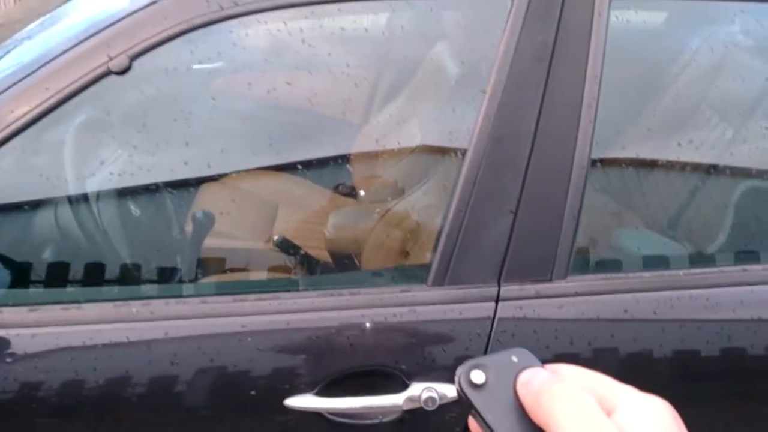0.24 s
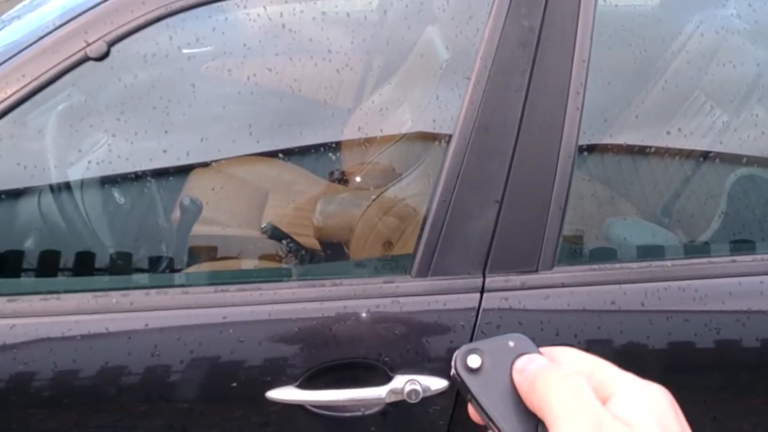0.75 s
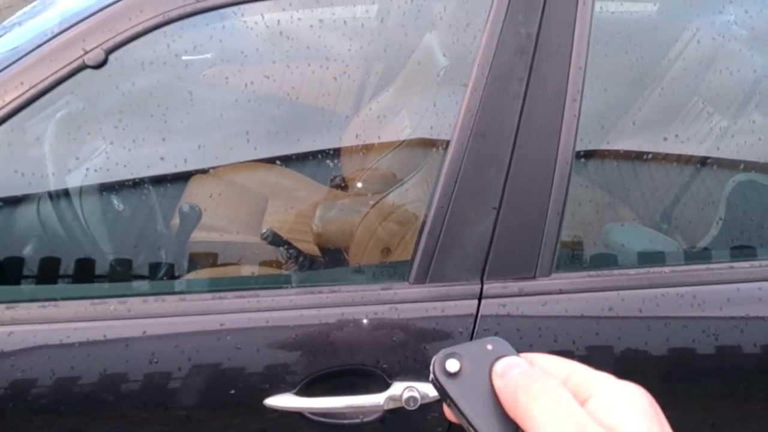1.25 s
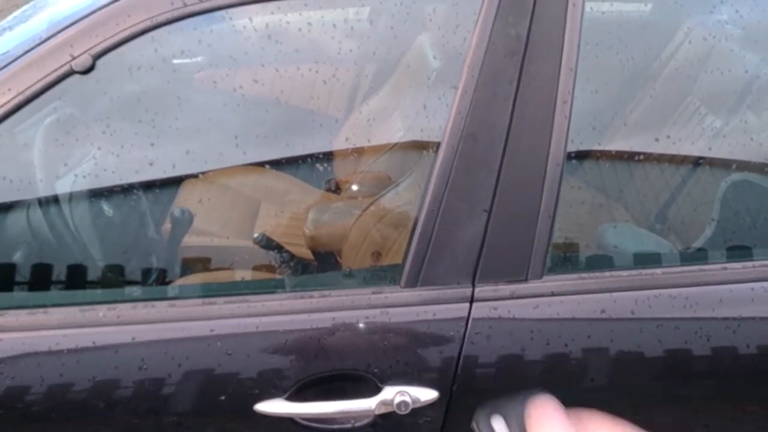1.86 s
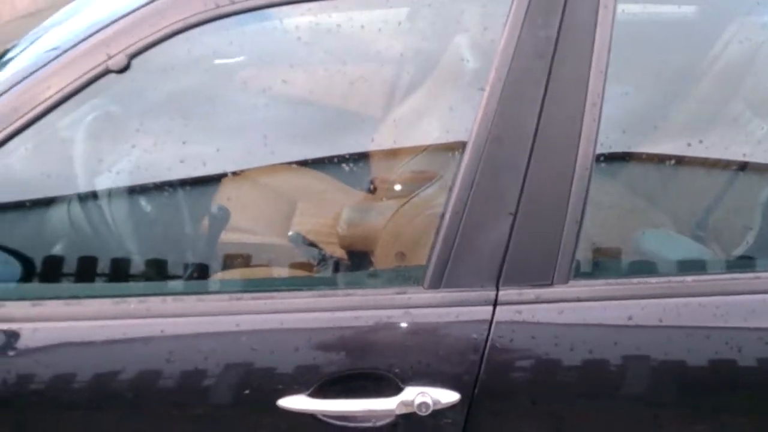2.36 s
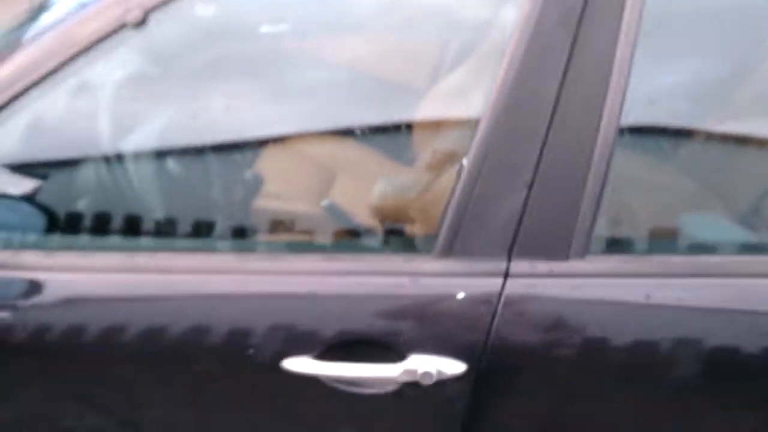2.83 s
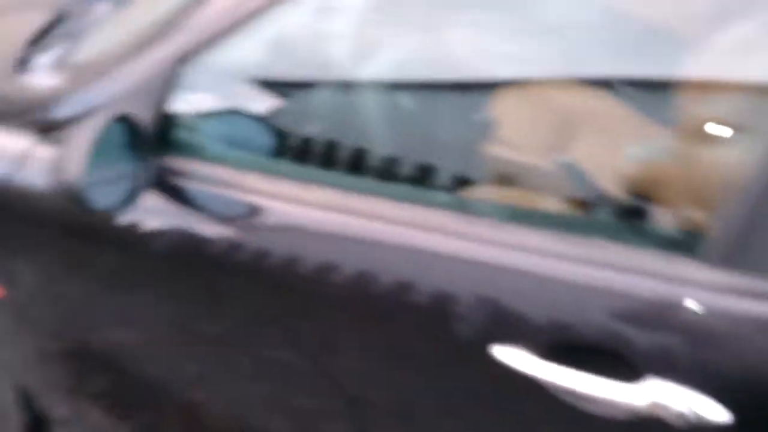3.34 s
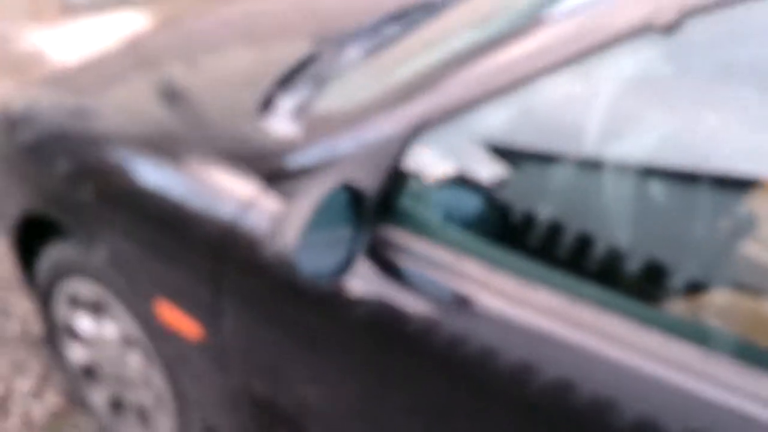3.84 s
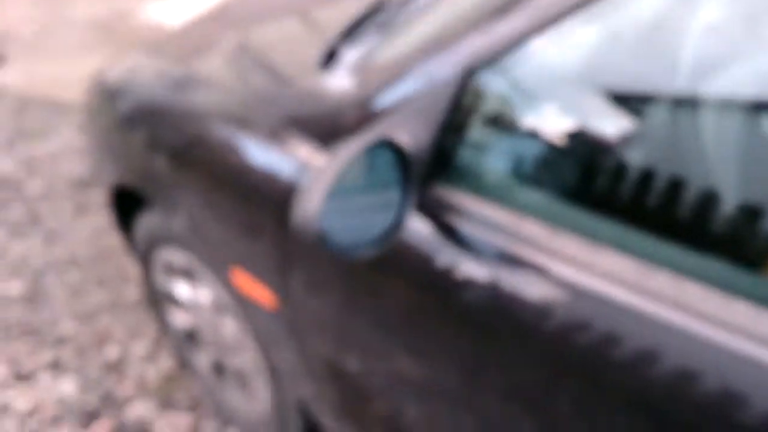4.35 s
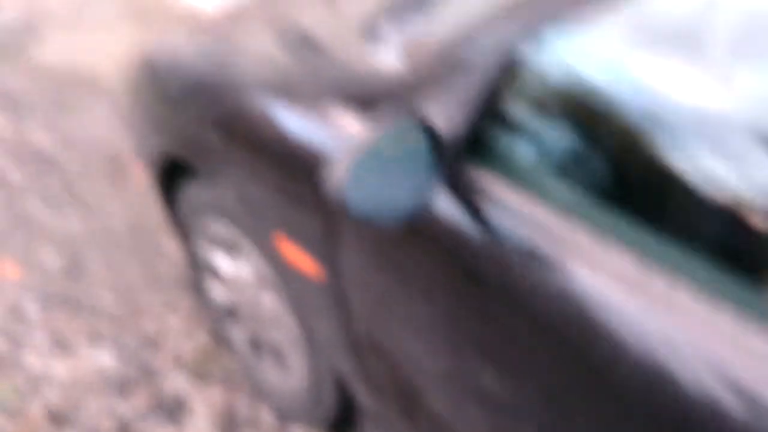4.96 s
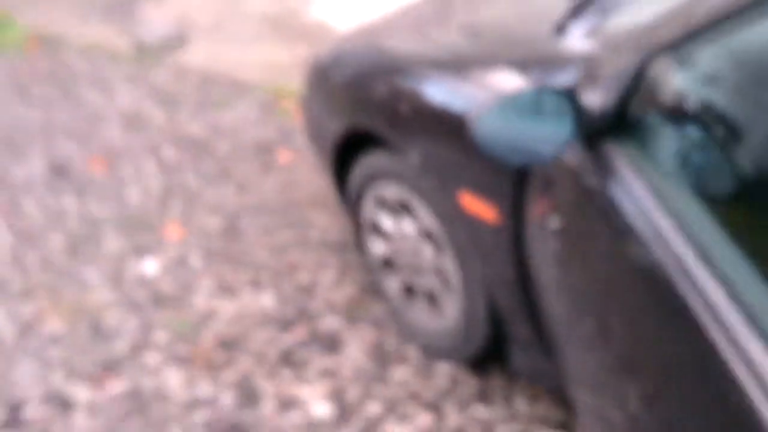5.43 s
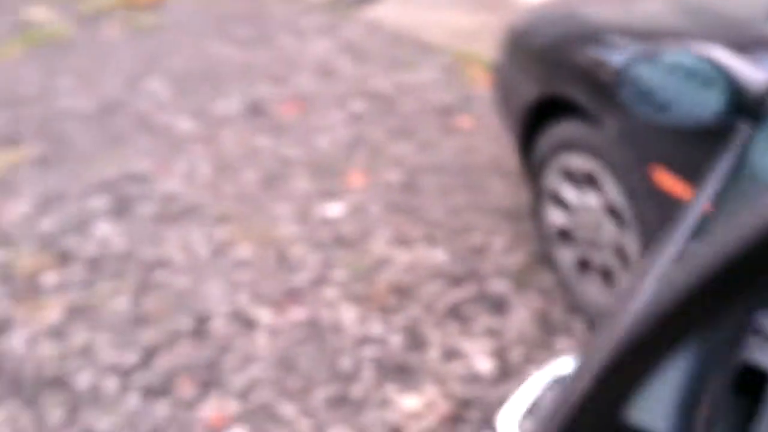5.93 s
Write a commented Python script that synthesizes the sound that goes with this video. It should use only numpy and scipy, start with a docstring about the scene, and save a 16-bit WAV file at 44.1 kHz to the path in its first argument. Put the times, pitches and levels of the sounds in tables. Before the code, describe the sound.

A handheld microphone near a parked car on gravel. Soft key contacts come before and after a brief lock motor buzz. Shoes shift on the stones, the bunch jangles densely, and its loud snap stands out. After a short lull the latch releases with a deep clunk, then the opening door knocks over its stay amid rustling sleeve and buffeting air.

```python
"""Outdoors by a parked car: a distant murmur and buffeting air, both shaped noise, lie under everything.
Keys touch, scraping noise with ringing blade modes; the lock motor whirrs briefly, noise with a boom.
The keys then jangle in the hand, shoes shift on gravel, cloth swishes in noise swells, and the key snaps.
At last the handle is pulled, the latch lets go and the door swings over the notches of its stay:
each blow excites modes of skin and latch case, clattering noise and, now and then, a low push of air."""
import sys
import numpy as np
from scipy import signal
from scipy.fft import rfft, irfft, next_fast_len
from scipy.io import wavfile
from scipy.ndimage import uniform_filter1d, map_coordinates

SR = 44100
rng = np.random.default_rng(int(sys.argv[2]) if len(sys.argv) > 2 else 0)


def waveform_to_disk(signal):
    """Save audio, clipped to [-1, 1], as 16-bit WAV at the path in sys.argv[1]."""
    frames = np.transpose(np.atleast_2d(signal))
    scaled = np.clip(frames, -1, 1) * 32767
    samples = np.round(scaled).astype(np.int16)
    wavfile.write(sys.argv[1], SR, samples)


N = 272979  # length in samples

# Spectra are relative: noise() rescales them to rms 1. Positive left_right_db means louder on the left.
# Coherence of the two channels: frequency_hz, likeness (1 = identical)
COHERENCE = [(100, 0.46), (300, 0.95), (600, 0.52), (1500, 0.083), (4000, 0.065), (12000, 0.051)]
TOP_HZ = 15650  # upper band limit

# Outdoor murmur, level before MURMUR_DB is added: time_s, level_db
MURMUR_LEVEL = [
    [(0.0, -75.5), (0.65, -82), (1.13, -76), (1.42, -81.5), (2.11, -77), (2.9, -71)],
    [(3.8, -74.5), (4.64, -70.5), (4.82, -70.5), (5.85, -70.5), (6.02, -69.5), (6.19, -72.5)],
]
# Murmur spectrum: frequency_hz, level_db
MURMUR_SPECTRUM = [(59, -45), (100, -7), (407, -10), (880, -7.5), (1240, -10), (4000, -24), (5200, -28),
                   (8800, -120)]
# Microphone hiss spectrum: frequency_hz, level_db
HISS_SPECTRUM = [(1000, -7), (4000, 0), (10000, 0), (15500, -6)]
MURMUR_DB, HISS_DB = 6.5, -79  # offset of the murmur; level of the hiss
# Puffs of air on the microphone: peak_s, level_db, fall_s (e-fold)
AIR_PUFFS = [(.92, -51, 0.14), (1.55, -53.5, 0.13), (2.61, -46.5, 0.079), (2.82, -46.5, 0.15),
             (3.135, -38.5, 0.044), (4.42, -50, 0.088), (4.95, -47.5, 0.2), (5.47, -43, 0.11),
             (5.6, -32.5, 0.029), (5.86, -45, 0.12)]
# Buffeting spectrum: frequency_hz, level_db
BUFFET_SPECTRUM = [(7.1, -44), (12, 10.5), (22, 4.5), (41, -1), (65, -4.5), (92, -13), (128, -24),
                   (390, -35), (660, -120)]
PUFF_RISE, BREEZE_DB = 0.93, -58  # rise time over fall time; steady breeze between the puffs

# Decay of the yard's scattered answer: frequency_hz, t60_s
YARD_DECAY = [(150, 0.91), (450, 0.46), (1200, 0.3), (3000, 0.44), (10000, 0.24)]
KEYS_YARD_DB, CAR_YARD_DB = -18, -17.5  # send levels to the yard

# Shoes on gravel: start_s, grit_db, tread_db, tread_hz, decay_s (e-fold)
FOOTFALLS = [(2.603, -77, -39.5, 112, 0.016), (2.616, -48.5, -53.5, 218, 0.064),
             (2.798, -83, -53.5, 168, 0.017), (2.83, -70, -49, 128, 0.028), (3.13, -55, -75, 149, 0.25),
             (4.256, -81, -53.5, 448, 0.026), (4.324, -72, -50, 117, 0.035),
             (5.585, -81, -42.5, 149, 0.027), (5.842, -56, -46.5, 153, 0.029)]
# Shifting grit spectrum: frequency_hz, level_db
GRIT_SPECTRUM = [(240, -27), (400, -14), (697, -5.5), (1250, -6.5), (2000, -16), (5000, -32), (13200, -110)]
# Thud of the sole: octaves from tread_hz, level_db
TREAD_SPECTRUM = [(-2.5, -16), (0, 1.5), (1.5, -21), (4, -100)]
STEP_ATTACK_S = 0.0064  # e-fold rise

# Strokes of the arm: peak_s, rubbing_db, fall_s (e-fold)
ARM_STROKES = [(2.78, -67.5, 0.18), (4.002, -59, 0.015), (4.1, -65, 0.041), (4.32, -65, 0.08),
               (4.82, -67, 0.11), (5.19, -57.5, 0.034), (5.31, -50, 0.077), (5.6, -52, 0.13),
               (5.85, -60.5, 0.1)]
# Rubbing cloth spectrum: frequency_hz, level_db
CLOTH_SPECTRUM = [(710, 0.5), (1200, -17), (1750, -6), (2010, 1), (2620, -8.5), (3010, 2.5), (3500, -5.5),
                  (4240, -2), (4720, 1.5), (5730, -9.5), (6940, -1.5), (7980, 0.5), (8880, -6.5),
                  (10100, -5.5), (15500, -19.5)]
# Direction of the cloth: frequency_hz, left_right_db
CLOTH_BALANCE = [(1300, -6), (4400, -19), (8000, -15.5)]
STROKE_RISE = 0.99  # rise time over fall time
PRESS, BODY_HZ = 0.33, 5500  # exponent of low-band growth with force; upper edge of that band
# Quick, high swish of cloth: peak_s, level_db, fall_s (e-fold)
QUICK_SWISH = [(4.102, -61.5, 0.052)]
# Quick swish spectrum: frequency_hz, level_db
WHISK_SPECTRUM = [(2500, -23), (5500, -3), (7500, 6), (9200, -5), (15000, -20)]

# Lock motor: one stroke, with separate envelopes for the gear rattle and the door's boom
LOCK_S, LOCK_RUN_S = 1.198, 0.063  # start and length
GEAR_DB, GEAR_ATTACK_S, GEAR_T60_S = -49.5, 0.0085, 0.11
BOOM_DB, BOOM_ATTACK_S, BOOM_T60_S, BOOM_LAG_S = -49, 0.037, 0.19, 0.0071
# Gear rattle spectrum: frequency_hz, level_db
GEAR_SPECTRUM = [(260, -37), (450, -18), (786, -11.5), (1810, -19), (3170, -19.5), (4850, -23.5),
                 (8300, -22), (15000, -51)]

# Swings of the bunch in the hand: peak_s, jostling_db, fall_s (e-fold)
BUNCH_SWINGS = [(2.88, -59, 0.021), (3.05, -55.5, 0.038), (3.16, -53.5, 0.075), (3.405, -50.5, 0.026),
                (3.458, -42.5, 0.022), (3.522, -50, 0.027), (3.598, -46, 0.0076), (3.65, -51.5, 0.028)]
SWING_RISE = 1  # rise time over fall time
# Key contacts: start_s, level_db, free_blade_hz, fob_knock_db, left_right_db, ring_db, scrape_t60_s
# (fob_knock_db and ring_db are relative to level_db)
KEY_CONTACTS = [(0.799, -54.5, 5600, -7.5, 8, -38, 0.0091), (0.965, -60, 8790, -4, 9, -23, 0.0059),
                (0.9835, -49.5, 5460, -9, 9, -20, 0.0091), (1.852, -62, 10220, -20, 10, -19, 0.014),
                (1.9308, -55.5, 9300, -34, 7, -17, 0.0056), (2.0025, -54.5, 8790, -19, 12, -11, 0.011),
                (2.0298, -54, 13650, -27, 10, -10, 0.0084), (2.2115, -54, 9800, -22, 0, -20, .012),
                (2.3205, -47, 8000, -33, 5, -19, 0.011), (2.836, -45.5, 7940, -7, 0, -25, 0.0072),
                (2.883, -51.5, 7090, -9, -1.5, -6.5, 0.0052), (2.902, -50, 10220, -6, -2, -19, 0.0097),
                (2.92, -51, 7240, -20, 3, -9, 0.0073), (2.965, -54.5, 6680, 2, 5, -0.5, 0.0089),
                (3.037, -52, 5600, -25, 3, -5, .009), (3.0757, -55, 10220, -18, -2, -4, .012),
                (3.0987, -46.5, 10220, -14, -2.5, -2, 0.031), (3.1553, -40.5, 8790, -4, -4, -10, 0.072),
                (3.2092, -56, 14800, -22, -3, -6, 0.041), (3.2939, -44.5, 8500, -5.5, -2, -21, .008),
                (3.3438, -47.5, 10220, -19, -7, -7, 0.025), (3.384, -36, 7800, -33, -1.5, -12, 0.027),
                (3.416, -37, 8790, -27, -1, -5.5, 0.0065), (3.447, -41, 9900, -15, -3, -10, 0.057),
                (3.463, -36, 10220, -13, -2, -16, 0.022), (3.508, -37, 8790, -21, 6, -15, 0.0067),
                (3.5145, -45.5, 13900, 10, -3, -8, .012), (3.5839, -41, 14190, -9, 1, -4, 0.033),
                (3.6688, -51.5, 10220, -16, -5, -4, .015), (3.695, -52, 8790, -26, 2, 9.5, .012),
                (3.7065, -51, 6680, -9, -9, -12, 0.036), (3.9896, -47, 8050, -30, 14, -21, 0.0078),
                (4.05, -49.5, 9300, -16, 5, -15, .007), (4.0577, -62, 7600, 14, -6, -25, 0.01)]
# Modes of freely hanging blades, before the hand's damping: frequency_hz, level_db, t60_s
BLADE_MODES = [(5630, -9.5, 0.33), (6650, 1.5, 0.11), (7070, -3.5, 0.044), (7700, 4, 0.067),
               (8760, 1, 0.27), (10140, 2, 0.24), (13500, -4.5, 0.14), (14190, -5.5, 0.13), (15400, -2, .1)]
# Direction of each blade: frequency_hz, left_right_db
BLADE_BALANCE = [(6700, -13), (8800, 8), (10200, 13), (14000, 2)]
# Bare metal contact spectrum: frequency_hz, level_db
CLINK_SPECTRUM = [(150, -66), (410, -35.5), (700, -6.5), (1240, 0.5), (2200, -9), (4290, -2.5), (8120, -3),
                  (10300, -1.5), (12300, -12.5), (14400, -22), (15800, -14)]
SLIDE_S, SLIDE_DB = 0.015, -19  # e-fold growth of the slide before a strike; level relative to the contact
# Folding key snapping into its fob: start_s, level_db
KEY_SNAPS = [(3.234, -17.5)]
# Fob shell modes: frequency_hz, level_db, t60_s
FOB_MODES = [(1380, -22, 0.045), (2640, -26, 0.025), (4520, -5, 0.014), (5510, -8.5, 0.012),
             (6500, -8, 0.008), (8660, 0, 0.0073), (10500, -6, 0.0045), (14600, -15, 0.02)]
# Direction of the snap: frequency_hz, left_right_db
SNAP_BALANCE = [(5500, -5.5), (8700, 10), (13000, -6)]

# Ticks and chirps of handle spring and hinge: start_s, level_db, pitch_hz, t60_s
SPRING_TICKS = [(4.8865, -50.5, 4200, 0.033), (5.022, -51, 11900, 0.0037), (5.705, -45, 4170, .028)]
# Tick spectrum: octaves from pitch_hz, level_db
TICK_SPECTRUM = [(-4, -50), (-1.2, -20), (-.25, -13), (0, 0), (.25, -13), (1.5, -26)]
# Blows of handle, latch and stay: start_s, panel_db, boom_hz, latch_db, clack_hz, crack_db, clatter_s
DOOR_BLOWS = [(4.661, -49, 397, -65, 1480, -49, 0.0045), (4.667, -42.5, 436, -67, 900, -74, 0.0045),
              (4.76, -23, 430, -29.5, 800, -50.5, 0.0032), (4.869, -61, 600, -69, 790, -69, 0.0032),
              (4.888, -48.5, 680, -54, 760, -80, 0.006), (5.043, -48.5, 520, -73, 750, -73, 0.0044),
              (5.063, -42, 403, -40.5, 1290, -56, 0.0007), (5.081, -44.5, 300, -67, 800, -86, 0.017),
              (5.2789, -27.5, 604, -27.5, 1480, -35, 0.0074), (5.358, -48, 565, -63, 750, -71, 0.025),
              (5.487, -57, 440, -70, 745, -71, 0.012), (5.7408, -62, 556, -34, 1500, -53, 0.0035),
              (5.837, -55, 450, -63, 796, -71, 0.057)]
# Door skin and cavity modes: frequency_hz, level_db, t60_s
PANEL_MODES = [(217, 6.5, 0.038), (317, -14, 0.2), (442, 0.5, 0.042), (499, 9.5, 0.027), (514.7, -7.5, 0.1),
               (653, -6, 0.057)]
# Latch case modes: frequency_hz, level_db, t60_s
LATCH_MODES = [(744, -5, 0.049), (945, -13.5, 0.096), (1088, 1, 0.021), (1259, -13, 0.059),
               (1462, -1, 0.032), (1592, -12, 0.044), (1862, -9.5, 0.029), (2730, -13, 0.017)]
# Steel on steel spectrum: frequency_hz, level_db
CRACK_SPECTRUM = [(1180, -0.5), (2000, 1.5), (3150, 2), (3840, 4), (4140, 1), (5890, -4), (7550, -0.5),
                  (8960, -1.5), (9760, -3), (15500, -27)]
# Loose trim spectrum: octaves from boom_hz, level_db
TRIM_SPECTRUM = [(-3.5, -31), (0, -8), (0.36, -11), (1, -21), (5, -93)]
# Rattling rods spectrum: frequency_hz, level_db
LINKAGE_SPECTRUM = [(250, -7.5), (600, -4), (950, -5.5), (1550, -8), (2200, -13.5), (3300, -20),
                    (6000, -31), (15000, -73)]
# Air shoved by the door's weight: start_s, level_db, pitch_hz
AIR_PUSHES = [(4.7532, -23, 80), (5.064, -38, 118), (5.593, -27.5, 52.6), (5.843, -34, 79)]
PANEL_LAG_S, PANEL_RISE_S = 0.00164, 0.0036  # delay of the skin after the steel; its e-fold rise


def amp(db):
    """Decibel law: level to amplitude ratio."""
    return 10 ** (np.asarray(db) / 20)


def unit(x):
    """Normalization to rms 1."""
    return x / np.sqrt(np.mean(x ** 2) + 1e-20)


def along(points, hz):
    """Interpolation of (frequency, value) points on a logarithmic frequency axis."""
    f, v = np.transpose(points)
    return np.interp(np.log(hz + 1), np.log(f + 1), v)


def pan(db):
    """Level difference between left and right at constant total power."""
    return unit(amp([[db / 2], [-db / 2]]))


def wobble(rate):
    """Band-limited random modulation: a smooth curve through rate random knots a second."""
    knots = rng.standard_normal(int(N * rate / SR) + 4)
    return map_coordinates(knots, [np.arange(N) * rate / SR])


def filtered(x, response):
    """Linear filtering: the spectrum multiplied by a response of frequency."""
    n = x.shape[-1]
    m = next_fast_len(n + 4096)
    return irfft(rfft(x, m) * response(np.fft.rfftfreq(m, 1 / SR)), m)[..., :n]


def coherence_angle(hz):
    """Coherence as an angle: half the arccosine of the left-right likeness."""
    return np.arccos(np.clip(along(COHERENCE, hz), -1, 1)) / 2


def noise(spectrum, size=N):
    """Partial coherence: coloured stereo noise of rms 1 from independent mid and side parts."""
    def response(hz):
        angle = coherence_angle(hz)
        return amp(along(spectrum, hz)) * [np.cos(angle), np.sin(angle)]
    mid, side = filtered(rng.standard_normal((2, size)), response)
    return unit(np.array([mid + side, mid - side]))


def fade(t60, size=SR // 3):
    """Exponential decay: 60 dB lost in t60 seconds."""
    return amp(-60 * np.arange(size) / SR / t60)


def ring(modes, scatter_db, detune, size=SR // 3):
    """Modal superposition: damped sinusoids with random strength, pitch and left-right phase."""
    hz, db, t60 = np.transpose(modes)[:, :, None]
    t = np.arange(size) / SR
    strength, skew, drift = rng.standard_normal((3, len(modes), 1))
    shift = skew * coherence_angle(hz)
    sign = (-1) ** np.arange(len(modes))[:, None]
    envelope = sign * amp(db + scatter_db * strength - 60 * t / t60)
    swing = envelope * np.exp(2j * np.pi * hz * (1 + detune * drift) * t)
    return np.array([(swing * np.exp(1j * side * shift)).sum(0).imag for side in (1, -1)])


def blow(x):
    """Normalization of a transient to rms 1 over its first 25 ms."""
    return x / np.sqrt(np.mean(x[:, :SR // 40] ** 2) + 1e-20)


def add(track, s, x):
    """Superposition: mix x into the track at time s."""
    part = track[:, round(s * SR):][:, :x.shape[1]]
    part += x[:, :part.shape[1]]


def swells(rows, rise):
    """Power sum of movements that each build up, round off at their peak and die away."""
    s, db, length = np.transpose(rows)[:, :, None]
    u = (np.arange(N) / SR - s) / length
    skirt = np.exp(-np.minimum(np.maximum(u, -u / rise), 20))
    return np.linalg.norm(amp(db) * 2 * skirt / (1 + skirt ** 2), axis=0)


def drive(s, attack, hold, t60):
    """Driven response: an exponential approach from time s, held, then an exponential decay."""
    age = np.maximum(np.arange(N) / SR - s, 0)
    return (1 - np.exp(-age / attack)) * amp(-60 * np.maximum(age - hold, 0) / t60)


def outdoors():
    """Broadband ambience and turbulence: murmur, steady hiss, and lumps of air mostly on the right."""
    air_db = np.interp(np.arange(N) / SR, *np.vstack(MURMUR_LEVEL).T)
    murmur = amp(MURMUR_DB + air_db + 0.43 * wobble(4.7)) * noise(MURMUR_SPECTRUM)
    flow = np.hypot(amp(BREEZE_DB), swells(AIR_PUFFS, PUFF_RISE))
    gusts = amp(1.84 * np.array([wobble(6.5), wobble(14)]))  # left and right fluctuate separately
    buffet = flow * unit(noise(BUFFET_SPECTRUM) * gusts)
    return murmur * pan(-1.9) + amp(HISS_DB) * noise(HISS_SPECTRUM) + buffet * pan(-9.0)


def yard(x):
    """Diffuse scattering: car body and ground return a short answer with frequency-dependent decay."""
    white = noise([(20, 0), (SR / 2, 0)], size=SR // 2)
    hz, t, z = signal.stft(white, SR, nperseg=256)
    decay = amp(-60 * t / along(YARD_DECAY, hz)[:, None])
    tail = signal.istft(z * decay, SR, nperseg=256)[1]
    late = np.pad(x, ((0, 0), (SR // 200, 0)))  # 5 ms of delay
    return signal.fftconvolve(late, tail / np.linalg.norm(tail[0]), axes=1)[:, :N]


def steps():
    """Impact and granular friction: a shoe's soft tread under lumps of shifting gravel."""
    out = np.zeros((2, N))
    grit = unit(noise(GRIT_SPECTRUM) * amp(3 * wobble(130)))
    for s, grit_db, tread_db, tread_hz, length in FOOTFALLS:
        t = np.arange(N - round(s * SR)) / SR
        tread = noise([(tread_hz * 2. ** octave, db) for octave, db in TREAD_SPECTRUM], size=len(t))
        weight = (1 - np.exp(-t / STEP_ATTACK_S)) * np.exp(-t / length)
        add(out, s, weight * (amp(grit_db) * grit[:, -len(t):] + amp(tread_db) * tread))
    return out * pan(-2.7)


def sleeve():
    """Sliding friction: cloth rubs on the right, its low band growing with the force of the stroke."""
    rubbing = filtered(noise(CLOTH_SPECTRUM), lambda hz: amp([along(CLOTH_BALANCE, hz), 0 * hz]))
    rubbing = unit(rubbing)
    body = filtered(rubbing, lambda hz: 1 / (1 + (hz / BODY_HZ) ** 8))
    weave = unit(amp(1.9 * wobble(56) + 0.64 * wobble(980)))  # folds and threads catch and slip
    force = swells(ARM_STROKES, STROKE_RISE)
    missing_body = body * (1 - (force / force.max()) ** PRESS)
    return force * weave * (rubbing - missing_body)


def quick_swish():
    """Sliding friction: one quick pass of cloth gives a brief swell of high noise."""
    return swells(QUICK_SWISH, STROKE_RISE) * noise(WHISK_SPECTRUM) * pan(-3)


def lock_motor():
    """Structure-borne excitation: plastic gears rattle and shove the lock rods, which boom in the door."""
    rattle = amp(GEAR_DB) * drive(LOCK_S, GEAR_ATTACK_S, LOCK_RUN_S, GEAR_T60_S)
    boom = amp(BOOM_DB) * drive(LOCK_S + BOOM_LAG_S, BOOM_ATTACK_S, LOCK_RUN_S, BOOM_T60_S)
    teeth = unit(noise(GEAR_SPECTRUM) * amp(1.3 * wobble(500)))
    door = noise([(80, -14), (190, 3.5), (340, 3.5), (550, -5.0), (1000, -14), (3000, -58)])
    return rattle * teeth * pan(1.8) + boom * door * pan(-2.5)


def key_jostle(count=30):
    """Random impulse excitation: toothed edges touch many times, each a tiny ping damped by the hand."""
    out = np.zeros((2, N))
    size = SR // 10
    for _ in range(count):
        touches = (rng.random(N) < 170 / SR) * amp(2 * rng.standard_normal(N))  # about 170 a second
        engaged = np.maximum(wobble(30), 0) ** 2  # each pair of edges meets and parts, so pitches change
        blades = blow(ring(BLADE_MODES, scatter_db=6, detune=.06, size=size) * fade(.075, size=size))
        ping = noise(CLINK_SPECTRUM, size=size) * fade(0.016, size=size) + amp(-9) * blades
        out += signal.oaconvolve((touches * engaged)[None], ping, axes=1)[:, :N]
    # even out the random density before the swings shape it
    activity = np.sqrt(abs(uniform_filter1d(np.mean(out ** 2, axis=0), size=SR // 80)))
    return swells(BUNCH_SWINGS, SWING_RISE) * unit(out / (activity + 0.11 * activity.mean()))


def key_contacts():
    """Selective damping: after slide, crack and fob knock one blade rings; fingers damp and detune others."""
    out = np.zeros((2, N))
    before = SR // 20  # samples of slide ahead of the strike
    fob_spectrum = [(150, -59.0), (400, -20), (1000, 3.0), (1700, 0.0), (3500, -17.5), (8000, -34.5)]
    for s, db, bright_hz, fob_db, pan_db, ring_db, scrape in KEY_CONTACTS:
        # 1 at the free blade's pitch, falling to 0 for the blades held by the fingers
        free = lambda hz: np.exp(-(np.log(hz / bright_hz) / 0.06) ** 2)
        edge = noise([(hz, level + 4 * free(hz)) for hz, level in CLINK_SPECTRUM], size=SR // 3)
        crack = edge * (1.49 * fade(scrape) * (1 - fade(0.52 * scrape)) + 0.18 * fade(0.11))
        modes = [(hz, level + 10 * free(hz), t60 * (0.09 + 0.21 * free(hz)))
                 for hz, level, t60 in BLADE_MODES]
        held = 1 - free(np.array(BLADE_MODES)[:, :1])
        blades = blow(ring(modes, scatter_db=3, detune=.03 * held)) * pan(along(BLADE_BALANCE, bright_hz))
        fob = noise(fob_spectrum, size=SR // 3) * fade(0.046)
        metal = pan(pan_db) * (crack + amp(ring_db) * blades)
        add(out, s, amp(db) * (metal + amp(fob_db) * fob))
        slide = noise(CLINK_SPECTRUM, size=before) * np.exp(np.arange(-before, 0) / SR / SLIDE_S)
        add(out, s - 1 / 20, amp(db + SLIDE_DB) * pan(pan_db) * slide)
    return out


def key_snap():
    """Impulsive excitation: a sprung blade hits its stop, the stiff fob rings and the spring buzzes."""
    out = np.zeros((2, N))
    for s, db in KEY_SNAPS:
        shell = ring(FOB_MODES, scatter_db=1, detune=.01) * (1 - fade(.002))
        envelope = 0.8 * fade(0.006) * (1 - fade(.004)) + 0.13 * fade(0.062)  # strike, then buzz
        add(out, s, amp(db) * (shell + noise(CLINK_SPECTRUM, size=SR // 3) * envelope))
    return filtered(out, lambda hz: amp(np.outer([1, -1], along(SNAP_BALANCE, hz)) / 2))


def ticks():
    """Stick-slip: small steel parts of the door slip and catch in decaying bands of noise."""
    out = np.zeros((2, N))
    for s, db, hz, t60 in SPRING_TICKS:
        spectrum = [(hz * 2. ** octave, level) for octave, level in TICK_SPECTRUM]
        add(out, s, amp(db) * noise(spectrum, size=SR // 3) * fade(t60))
    return out


def near(modes, centre, slope_db):
    """Selective excitation: modes lose slope_db per octave away from the centre of the blow."""
    return [(hz, db - slope_db * abs(np.log2(hz / centre)), t60) for hz, db, t60 in modes]


def door_blows(count=6):
    """Coupled impact: chattering steel cracks and excites the latch case and the boom of the door skin."""
    out, t = np.zeros((2, N)), np.arange(SR // 3) / SR
    for s, panel_db, boom_hz, latch_db, clack_hz, crack_db, clatter in DOOR_BLOWS:
        when = (np.arange(count) + rng.random(count)) / count * abs(clatter)
        age = np.maximum(t - when[:, None], 0)
        force = amp(1.1 * rng.standard_normal((count, 1)))
        attack = 1 - np.exp(-age / .0008)
        # every contact of the clatter adds its own decaying energy
        chatter = lambda t60: np.linalg.norm(force * attack * amp(-60 * age / t60), axis=0)
        # trim and seals blur the modes of the skin
        skin = blow(ring(near(PANEL_MODES, boom_hz, 13), scatter_db=1.5, detune=.022))
        trim = noise([(boom_hz * 2. ** octave, db) for octave, db in TRIM_SPECTRUM], size=len(t))
        panel = skin + 0.4 * blow(trim * fade(0.085))
        panel = blow(panel * (1 - np.exp(-t / PANEL_RISE_S)))
        case = ring(near(LATCH_MODES, clack_hz, 7), scatter_db=2, detune=.008)
        case = blow(case * (1 - np.exp(-t / .002)))
        rods = blow(noise(LINKAGE_SPECTRUM, size=len(t)) * chatter(0.075))
        clack = blow(0.94 * case + rods)
        crack = blow(noise(CRACK_SPECTRUM, size=len(t)) * (chatter(0.012) + 0.08 * chatter(0.18)))
        add(out, s + PANEL_LAG_S, amp(panel_db) * panel * pan(-3.5))
        add(out, s, amp(latch_db) * clack * pan(1.4) + amp(crack_db) * crack)
    return out


def air_pushes():
    """Volume displacement: the door's weight shoves the air in quickly damped low sinusoids."""
    out, t = np.zeros((2, N)), np.arange(SR // 3) / SR
    for s, db, hz in AIR_PUSHES:
        add(out, s, -amp(db) * np.sin(2 * np.pi * hz * t) * fade(0.063) * pan(-6.5))
    return out


def scene():
    """Superposition of ambience, person, keys and car, with the yard's answer to keys and car."""
    background = outdoors() + steps() + sleeve() + quick_swish()
    keys = key_contacts() + key_jostle()
    car = lock_motor() + ticks() + door_blows() + air_pushes()
    answer = yard(amp(KEYS_YARD_DB) * keys + amp(CAR_YARD_DB) * car)
    return background + answer + keys + key_snap() + car


def record(dry):
    """Band limitation: an ideal low-pass removes everything from TOP_HZ upward."""
    return filtered(dry, lambda hz: hz < TOP_HZ)


dry = scene()
out = record(dry)
waveform_to_disk(out)
```